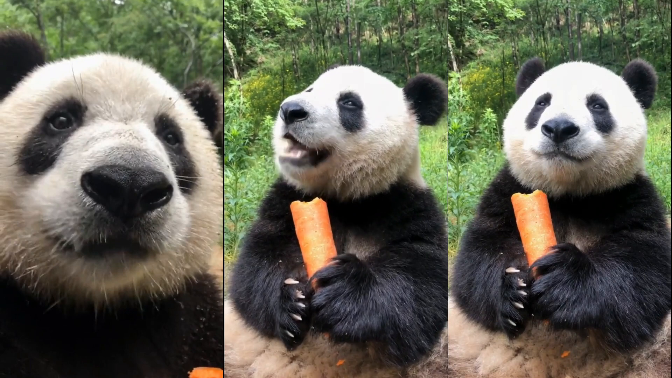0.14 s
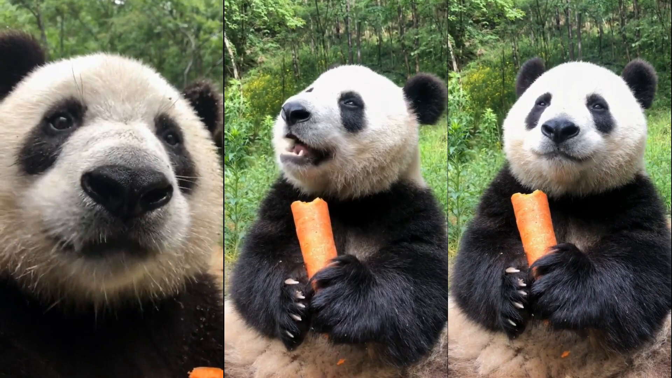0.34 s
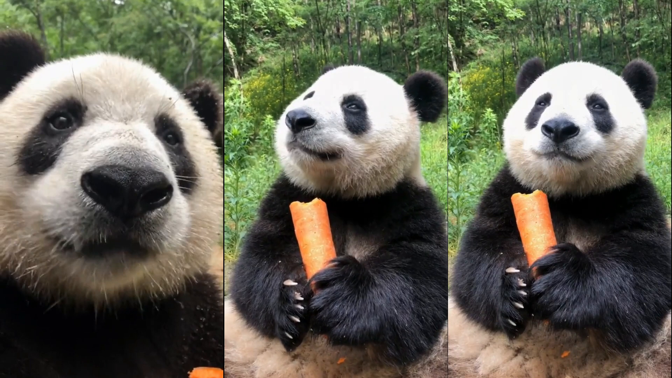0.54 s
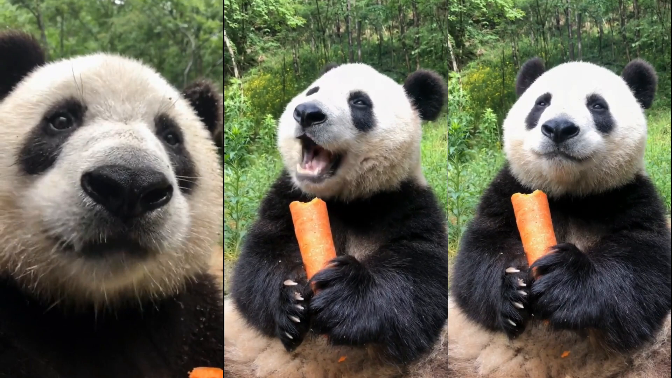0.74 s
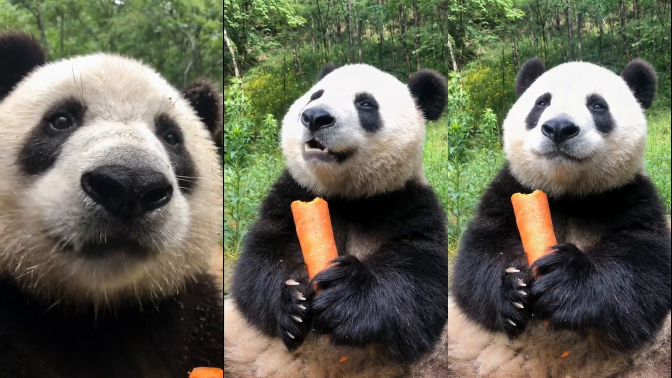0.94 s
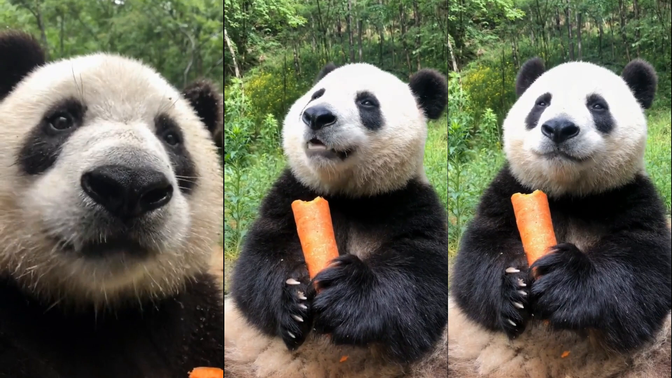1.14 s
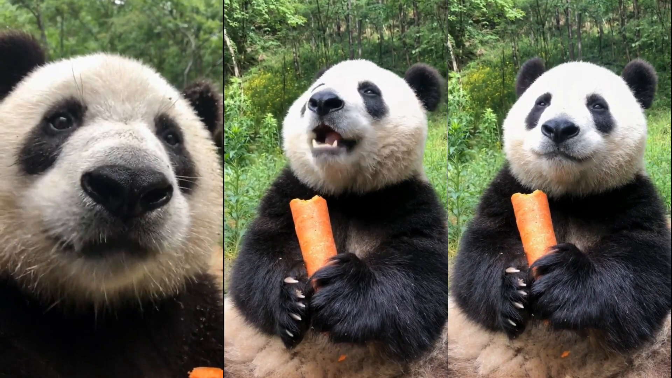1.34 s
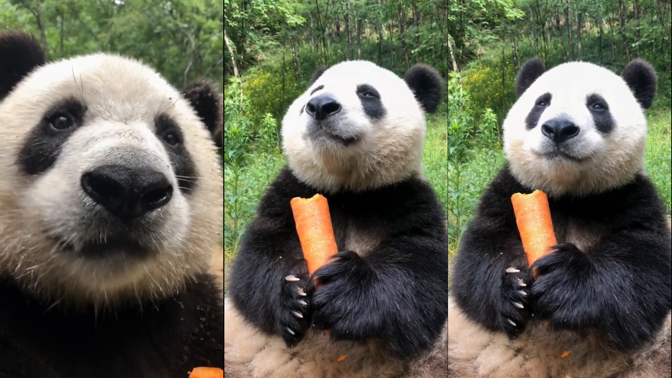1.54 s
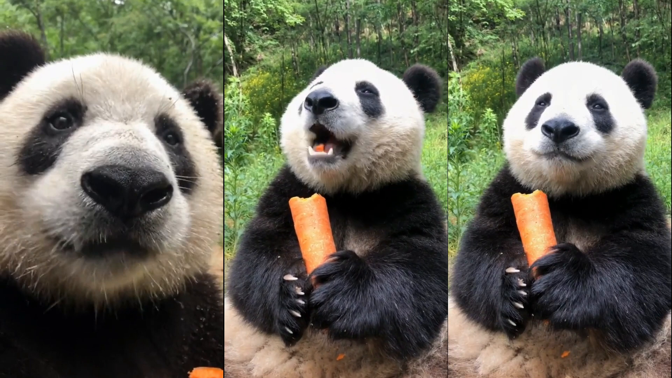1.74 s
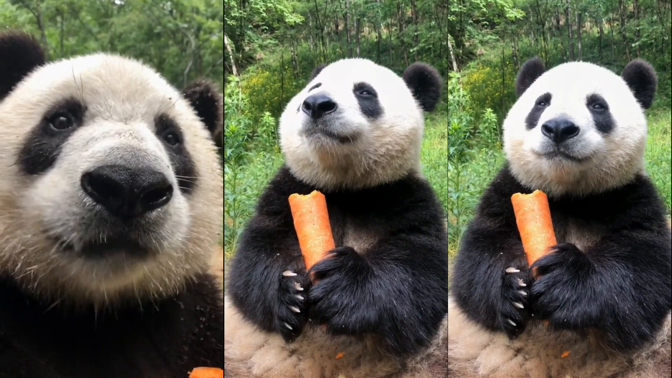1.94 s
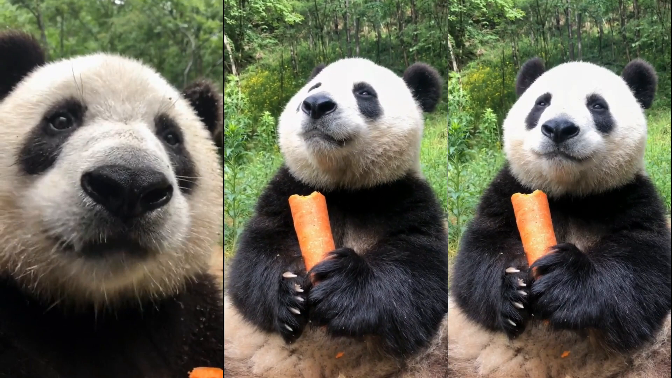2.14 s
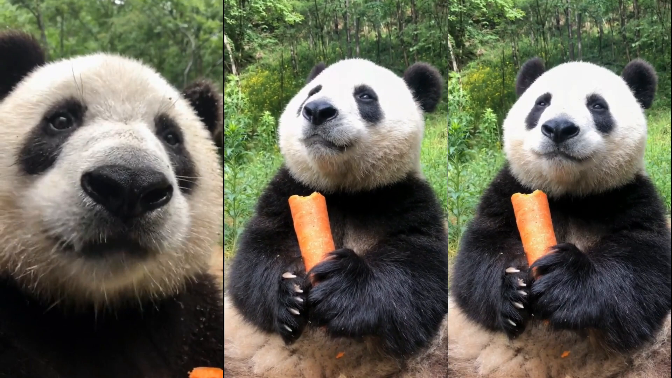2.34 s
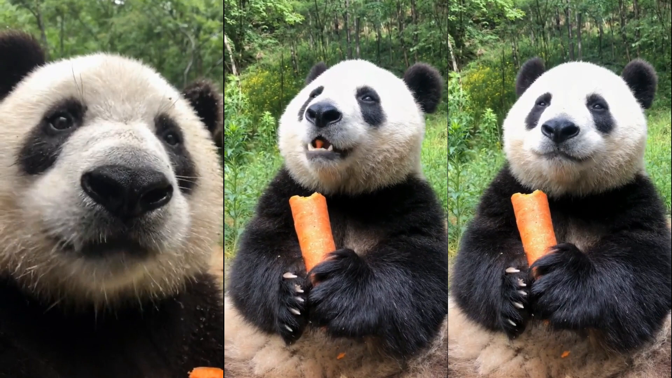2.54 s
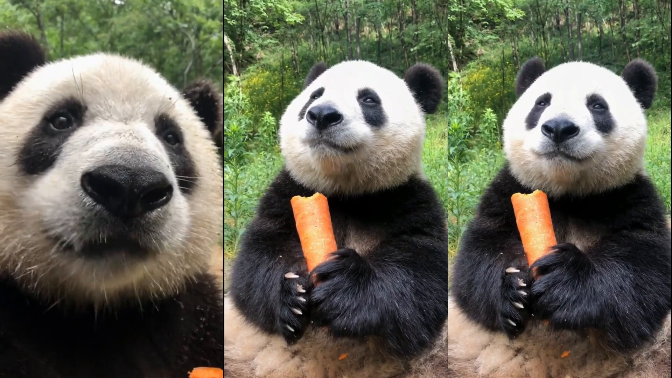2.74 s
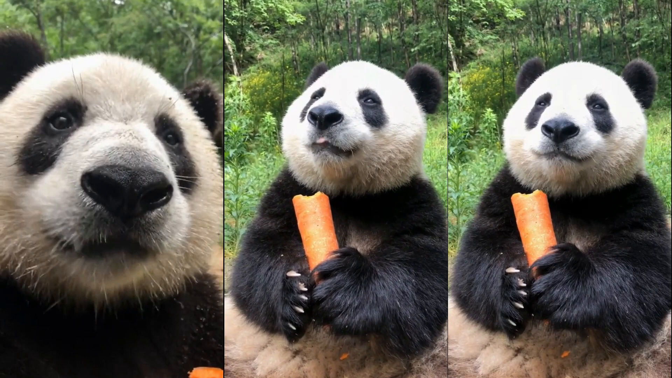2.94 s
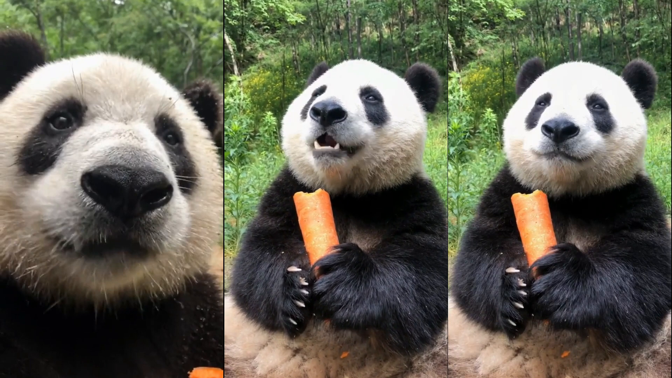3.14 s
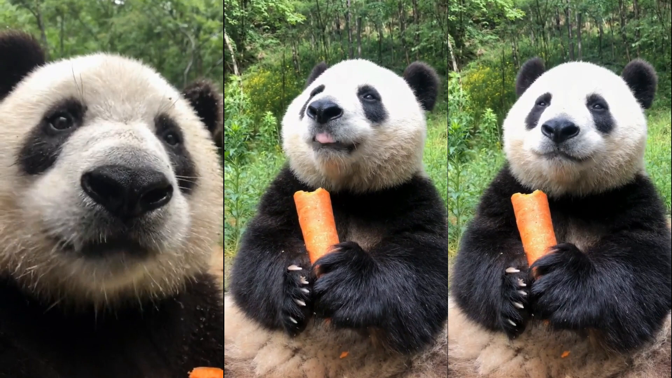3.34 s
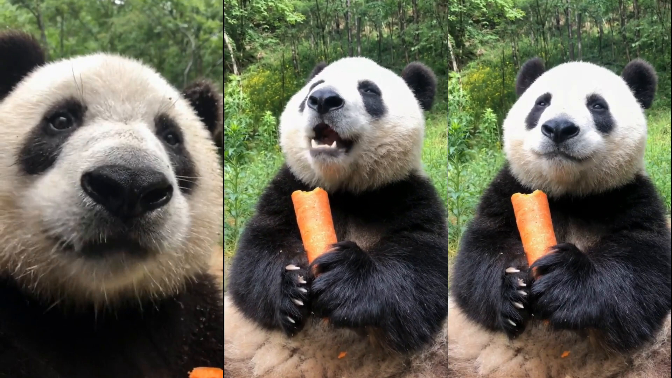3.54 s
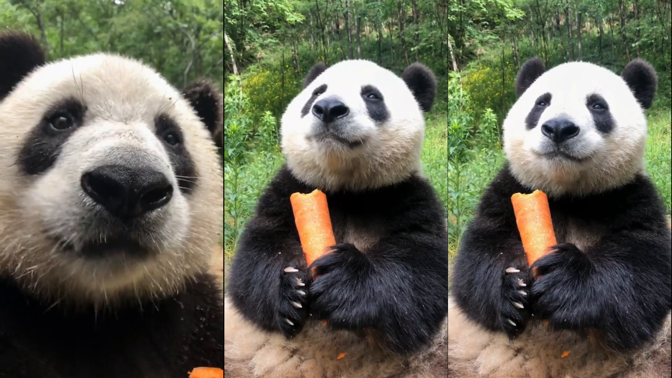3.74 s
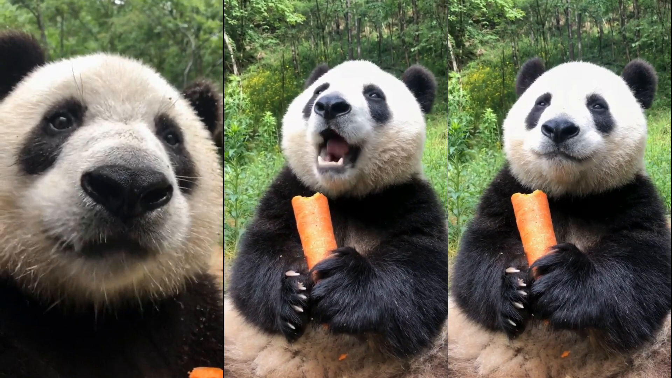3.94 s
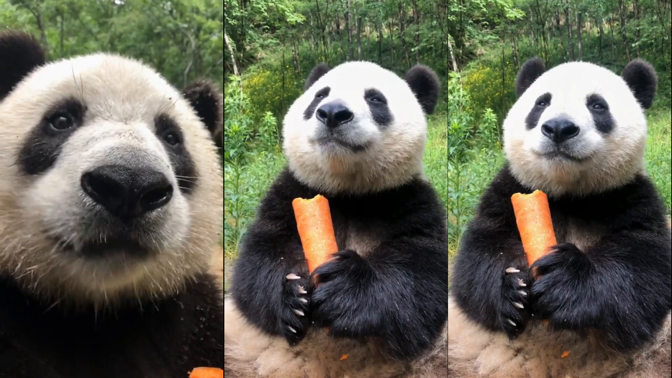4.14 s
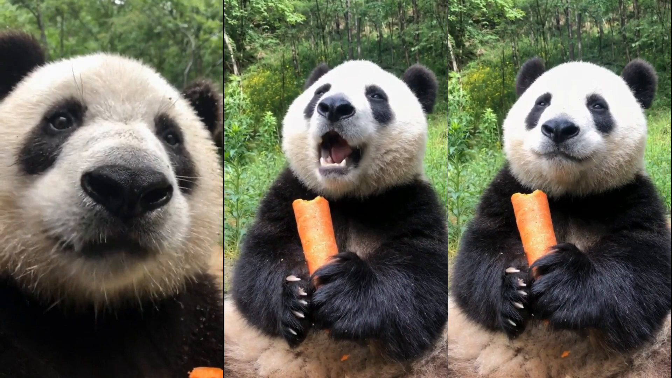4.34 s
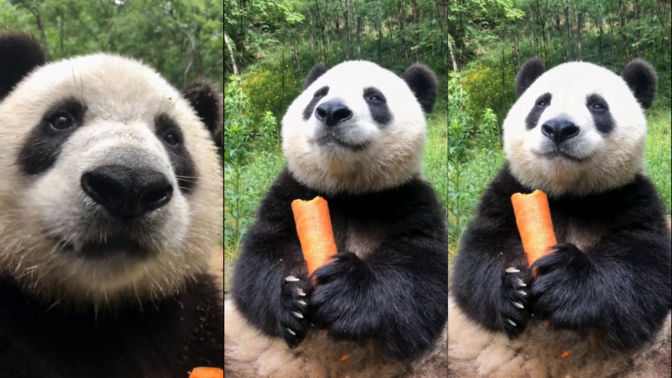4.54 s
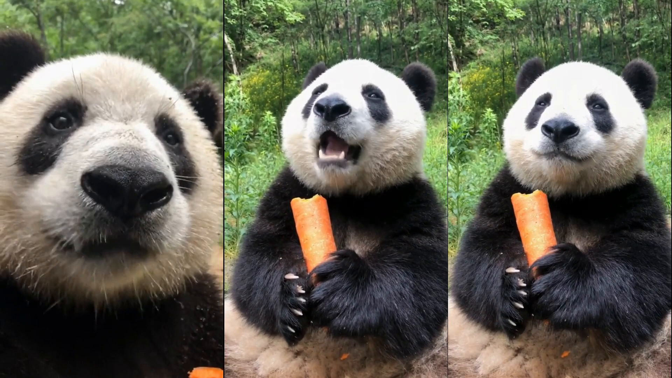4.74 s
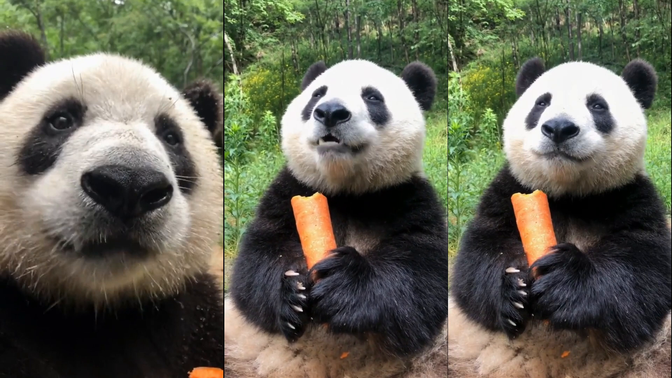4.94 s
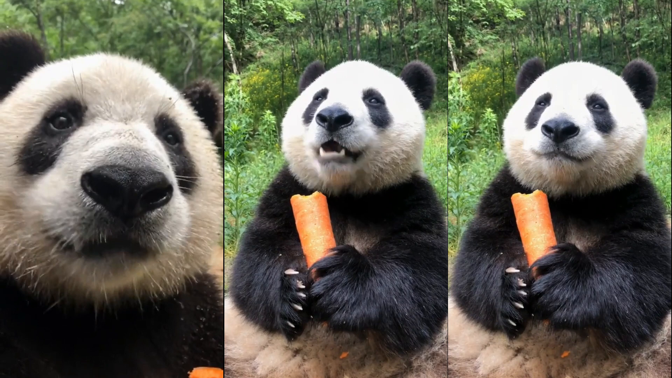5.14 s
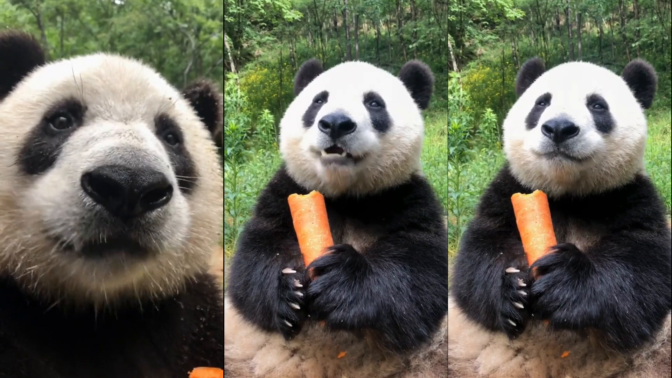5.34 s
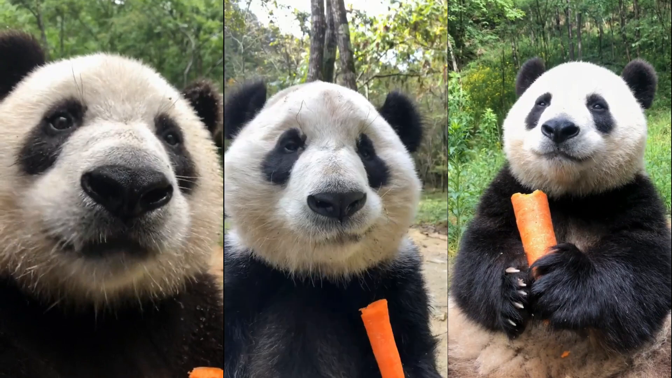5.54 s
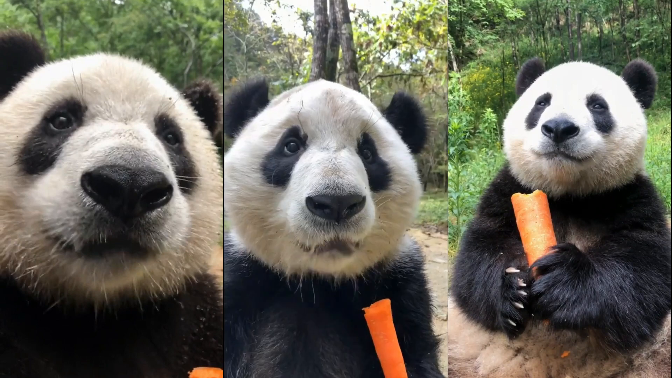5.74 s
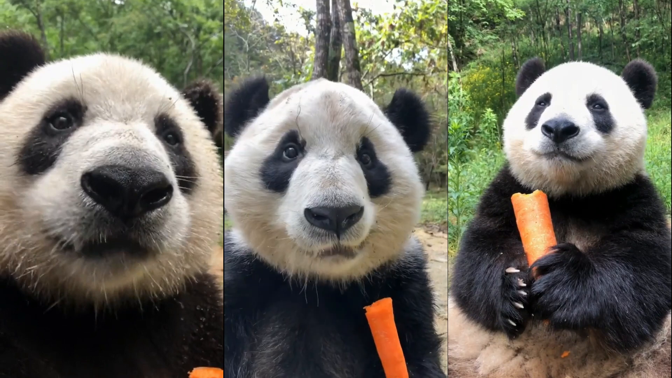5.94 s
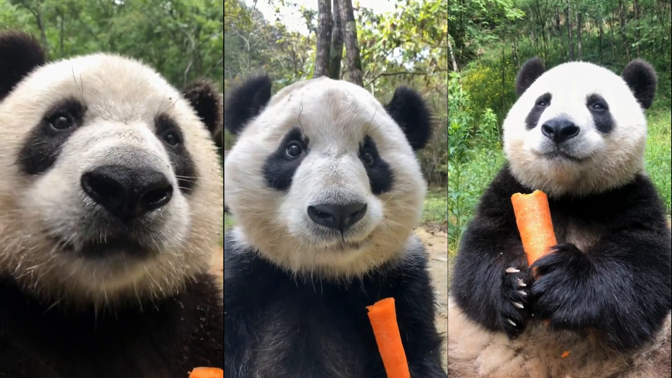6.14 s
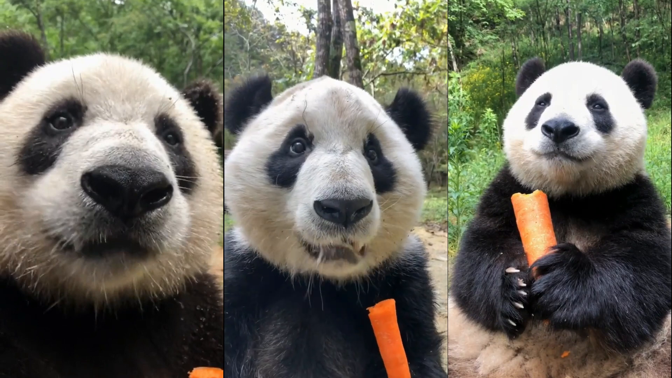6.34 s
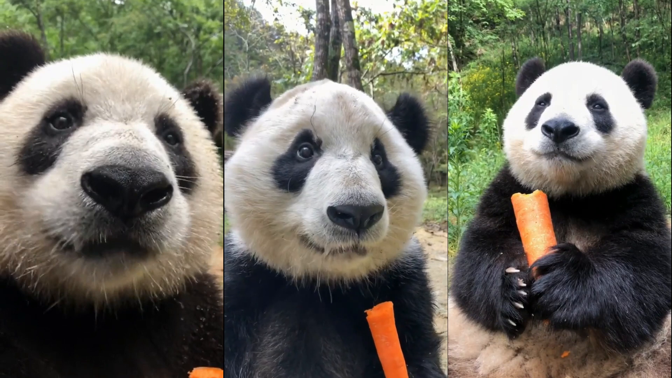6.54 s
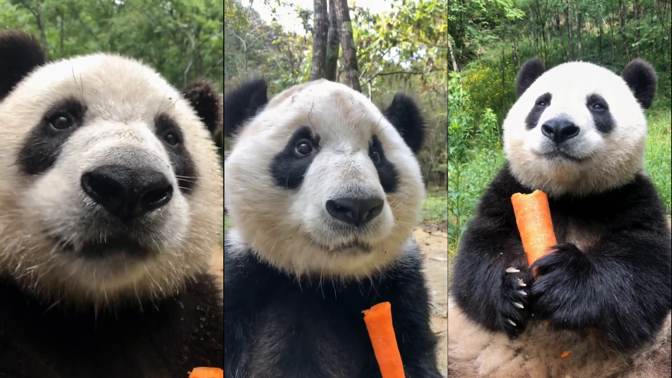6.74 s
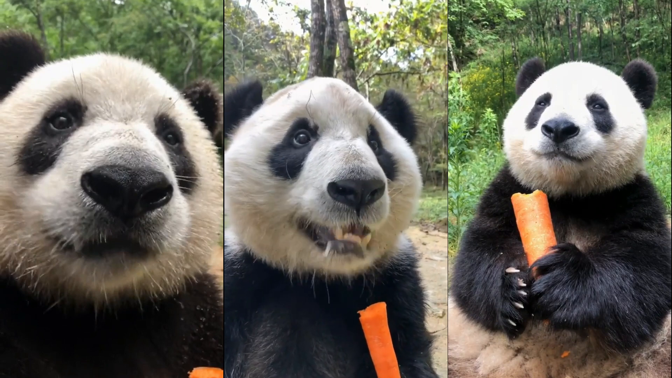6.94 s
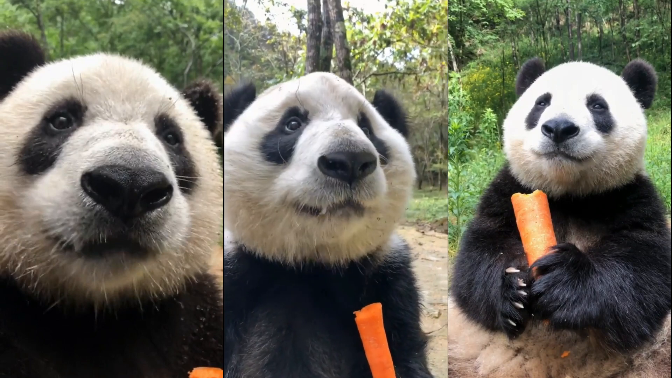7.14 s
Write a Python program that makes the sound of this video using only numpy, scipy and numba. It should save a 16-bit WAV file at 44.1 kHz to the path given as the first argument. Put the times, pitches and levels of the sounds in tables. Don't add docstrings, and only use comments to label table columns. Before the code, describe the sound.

Very close to the microphone, a panda chews raw carrot outdoors: brittle snaps and crackling bursts, wet pulp sliding, a low throat rumble. Small birds whistle behind, echoing among trees. Crunching eases after two seconds, returns around three and a half, and ends in a loud crack. After a tiny silence near 5.6 seconds, softer, muffled chews continue in a noisier yard.

```python
import sys
import numpy as np
from scipy import signal
from scipy.fft import rfft, irfft, next_fast_len
from scipy.io import wavfile
from scipy.ndimage import uniform_filter1d
from numba import njit

SR = 44100
rng = np.random.default_rng(int(sys.argv[2]) if len(sys.argv) > 2 else 0)


def attenuation_scalar(level_db):
    decades = np.asarray(level_db, float) / 20
    return 10 ** decades


def digitize_waveform(pressure):
    field = np.atleast_2d(pressure).T
    bounded = np.clip(field, -1, 1)
    quanta = np.round(bounded * 32767).astype(np.int16)
    wavfile.write(sys.argv[1], SR, quanta)


N = 316638

# greatest pressure in seconds, build-up in seconds,
# let-go in seconds, crackle in dB, brightness in dB.
BITES = [(.09, 0.36, 0.079, -35.5, -9.5), (0.257, 0.033, 0.057, -43, -22), (0.506, 0.13, 0.11, -26, -6),
         (0.71, 0.054, 0.022, -36, -12), (1.561, 0.093, 0.051, -33, -16), (.93, 0.26, 0.065, -51.5, 9),
         (1.071, 0.16, 0.12, -33.5, -7), (1.251, 0.057, 0.063, -37, -32), (1.496, 0.098, 0.054, -31, -4),
         (1.698, 0.038, 0.048, -32, -48), (1.936, 0.087, 0.13, -34, -20), (2.811, 0.15, 0.081, -48.5, -9.5),
         (3.35, 0.2, 0.046, -54, 2), (3.5, 0.048, 0.088, -49, -6), (3.698, 0.087, 0.14, -32, -8),
         (3.942, 0.063, 0.081, -32, -18), (4.16, 0.12, 0.11, -41.5, -7.5),
         (4.388, 0.093, 0.073, -37.5, -11), (4.61, 0.15, 0.13, -42.5, -13),
         (4.831, 0.084, 0.048, -38.5, -11), (5.053, 0.12, 0.13, -32, -10), (5.261, 0.03, 0.051, -24.5, -20),
         (5.419, 0.075, 0.18, -37.5, -7.5), (5.49, 0.057, 0.17, -38.5, -14)]
YARD_BITES = [
    (5.87, 0.035, .06, -41, -24),
    (6.065, 0.023, 0.062, -37, -25),
    (6.455, 0.036, 0.11, -35.5, -50),
    (6.525, 0.038, 0.031, -40.5, -53),
    (7.18, 0.081, .05, -37.5, -60),
]
EDGE_LOSS_DB, EDGE_CURVE = 28.5, 1.36
RESTING_DB, YARD_RESTING_DB, RESTING_BRIGHT_DB = -62.5, -50, -20
HOLLOW_DB, HOLLOW_PER_DB, HOLLOW_LATE_DB = -4, -0.0929, 8
SAG_PER_S = 1.0

# centre in Hz, width in Hz, lift in dB.
MOUTH = [(1280, 130, -8), (2600, 200, 3), (3700, 400, 3), (4350, 300, 2), (6400, 500, 2)]
# frequency in Hz, level in dB per Hz.
FIBRE_SPECTRUM = [(400, -6.5), (800, -1.5), (1600, 5.5), (3000, -4), (5000, -5), (9000, -13.5), (13000, -9)]

# time in seconds, peak in dB, ring in Hz,
# sharp edge in dB.
SNAPS = [(0.023, -25, 2300, -14), (0.035, -17, 2020, -20), (0.084, -18.5, 2660, -44),
         (0.106, -13.5, 1760, -8), (0.252, -54, 990, -6), (0.391, -28.5, 1720, -7),
         (0.417, -22.5, 1730, -34), (0.436, -25, 1010, 1.5), (0.484, -24, 1640, -18),
         (0.502, -17.5, 1690, 1), (0.573, -24.5, 1560, -38.5), (0.71, -16, 1550, -37),
         (0.881, -28, 1670, -15), (0.92, -20.5, 1480, -7), (0.937, -23, 1590, -4),
         (1.008, -17.5, 4570, -27), (1.05, -23.5, 2030, -11), (1.079, -19, 2060, -10),
         (1.245, -27, 1580, -29), (1.39, -34, 3680, -2), (1.485, -27.5, 4270, 6), (1.496, -23, 2020, -9),
         (1.688, -25.5, 844, -58), (1.699, -24, 1860, -48), (1.907, -32, 4320, -28),
         (0.463, -22, 4340, -16), (0.002, -22.5, 2200, -11), (0.507, -12.5, 2220, -3.5),
         (3.481, -33, 1540, -9), (3.673, -16, 2060, -9), (3.695, -15, 2330, -9),
               (3.701, -19.5, 3580, -6), (3.725, -24, 2580, -19), (3.934, -25, 1510, -18),
               (3.960, -25, 2100, -17), (3.905, -30, 2530, -7), (3.916, -18.5, 1530, -25),
               (4.338, -23, 1461, -1), (4.382, -16, 1530, -29), (4.458, -30.5, 2660, 9.5),
               (4.5, -31, 2960, -27), (4.821, -30, 1400, 9), (5.039, -24, 2240, -13.5),
               (5.044, -19.5, 2300, -4), (5.054, -14, 2410, -13), (5.218, -31, 2410, -3),
               (5.248, -14.5, 1590, -26.5), (5.351, -28, 826, -32), (5.402, -21.5, 870, -24),
               (5.483, -23, 2400, -17),
         (0.06, -15.5, 1830, -8), (0.057, -22.5, 3000, -32), (0.26, -25.5, 730, -6), (0.53, -10, 2030, -12),
         (0.71, -27, 1860, -28), (0.95, -19, 1760, -23), (0.29, -30.5, 2300, -10),
         (0.032, -21.5, 3000, -17), (0.005, -20.5, 2150, -17), (2.135, -38, 3400, -15),
         (1.134, -21.5, 790, -36), (1.828, -31, 1600, -24), (2.141, -33, 1630, -27), (2.5, -56, 1500, 11),
         (2.655, -40.5, 1570, -2), (2.796, -33.5, 814, -6), (2.833, -36, 690, -33), (3.343, -38, 1340, -21),
         (3.593, -37.5, 1680, -7), (3.805, -30.5, 1560, -16), (4.041, -31, 3300, -11),
         (4.77, -36.5, 2050, -28), (5.083, -19, 907, -25), (5.262, -15, 1480, 0), (5.414, -24.5, 2700, -4),
         (5.472, -25, 3260, -17), (3.365, -41, 2700, -13), (3.781, -30, 2000, -19.5),
         (4.592, -28.5, 2100, -22),
         (5.749, -30, 1000, -23), (5.895, -25.5, 760, -31), (6.064, -24.5, 1100, -35),
              (6.18, -23.5, 1340, -38), (6.237, -25.5, 1120, -36), (6.274, -24.5, 1050, -19),
              (6.444, -25, 2200, -29), (6.482, -26.5, 1700, -20), (6.47, -34, 1250, -5),
              (6.455, -31, 1900, -25), (6.512, -28, 670, -30), (6.505, -28.5, 1600, -38),
              (6.529, -24.5, 1540, -46), (6.763, -26.5, 790, -47), (7.175, -16.5, 1300, -50),
         (.088, -21, 2770, -20), (.098, -20, 2430, -18), (.159, -33, 1680, -7),
               (.473, -22, 3220, -18), (0.494, -21, 4300, -11), (.559, -40, 1680, -8),
               (0.869, -35, 2400, -20), (.898, -34, 1530, -9), (.985, -31, 1080, -5),
               (1.019, -22, 2150, -16), (1.057, -22, 2000, -8), (1.085, -22.5, 2100, -7),
               (1.103, -19, 840, -17), (1.115, -24, 800, -17), (1.226, -36, 1600, -21),
               (1.258, -31.5, 2500, -25), (1.289, -36, 1550, -20), (1.452, -31, 1660, -2),
               (1.733, -39, 3660, -3), (1.946, -38, 1710, -20), (1.963, -31, 1900, -27),
               (1.932, -26, 750, -25),
         (3.385, -49, 2520, -20), (3.510, -38, 1530, -24), (3.551, -39, 1600, -14),
                     (3.638, -37, 2210, -5), (3.709, -21, 2670, -19), (3.733, -20.5, 1550, -27),
                     (3.948, -17, 1700, -8), (4.101, -38, 1700, -5), (4.16, -42, 2010, -21),
                     (4.374, -26, 3640, -22), (4.393, -26.5, 1560, 0), (4.616, -35, 1480, -24),
                     (4.642, -30.5, 820, -18), (4.666, -41, 830, 4), (4.915, -40.5, 3540, 0),
                     (4.994, -34, 2220, -2), (5.172, -37, 958, -18), (5.223, -32, 2580, -11.5),
                     (5.274, -24, 1690, -24), (5.369, -34, 890, -28), (5.439, -27, 2130, -16),
                     (5.773, -37, 2980, -4), (5.871, -36, 2010, -22), (6.161, -34, 2500, -23),
                     (6.299, -34, 1200, -5), (6.423, -37, 1000, -11), (6.953, -33.5, 900, -0.5),
                     (7.078, -35, 810, -15.5), (5.887, -37, 4300, -10), (6.065, -38, 4430, -21)]
# centre in Hz, width in Hz, level in dB.
SNAP_CAVITIES = [(1084, 170, -7.5), (2100, 117, -5), (3220, 480, -8.5), (4300, 320, -10.5),
                 (6030, 300, -20)]

# time in seconds, peak in dB.
CRACKS = [
    (0.106, -13),
    (0.513, -23),
    (0.938, -20),
    (1.008, -15),
    (1.7, -39),
    (1.907, -35),
    (3.674, -27.5),
    (4.459, -31),
    (5.263, -2.5),
]
CRACK_HZ, CRACK_WIDTH_HZ = 4900, 2300

# time in seconds, first resonance in Hz, second resonance in Hz.
CAVITY = [(0.0, 1055, 1930), (0.28, 756, 1850), (0.54, 1100, 1950), (0.6, 674, 1700), (0.68, 1066, 1860),
          (0.92, 870, 1620), (1.04, 1000, 2180), (1.16, 680, 1630), (1.46, 950, 1610), (1.78, 776, 1570),
          (2.56, 864, 1830), (4.88, 734, 1540), (5.04, 820.5, 2130), (5.24, 962, 1560), (5.48, 860, 2220),
          (5.54, 910, 1740), (6.86, 818, 1710), (7.18, 890, 1570)]
# ratio to the second, width in Hz, level in dB.
UPPER_CAVITIES = [(1.55, 300, -20), (1.95, 350, -18)]
# time in seconds, build-up in seconds, let-go in seconds, level in dB.
SLIDES = [(.35, .14, 0.15, -46), (.59, 0.062, 0.029, -38), (1.12, 0.046, 0.035, -41),
          (1.39, 0.014, 0.01, -38.5), (3.78, 0.059, 0.046, -31), (4.05, 0.23, 0.077, -47.5),
          (4.2, 0.041, 0.08, -43.5), (1.7, 0.03, 0.021, -51), (4.93, 0.053, 0.043, -53),
          (5.44, 0.19, 0.17, -47.5), (6.51, 0.052, 0.033, -38.5)]

# time in seconds, build-up in seconds, let-go in seconds, level in dB.
GROANS = [
    (.12, 0.12, 0.2, -48),
    (3.9, 0.17, 0.37, -43),
    (4.83, 0.06, 0.052, -46),
]
GROAN_HZ, GROAN_WIDTH_HZ = 148, 113
RUMBLE_DB, RUMBLE_FOLLOWS, RUMBLE_SMOOTH_S = -57, 0.52, 0.015

# start in seconds, level in dB.
RISING = [
    (.53, -51.5),
    (3.015, -49.5),
    (3.41, -48.5),
    (3.84, -50),
]
FALLING = [
    (1.96, -72),
    (3.18, -58.5),
    (3.585, -57),
]
HIGH_FALLING = [
    (.715, -60.5),
    (1.125, -60.5),
]
# length in seconds, start in Hz, middle in Hz, end in Hz.
RISING_SHAPE = (.1, 3720, 4320, 5400)
FALLING_SHAPE = (0.084, 7750, 6950, 6200)
HIGH_FALLING_SHAPE = (.1, 8200, 7200, 5300)
# start in seconds, length in seconds, start in Hz, end in Hz, level in dB.
SONG = [
    (1.355, 0.1, 3296, 4010, -40.5),
    (1.445, 0.048, 4010, 4440, -41),
    (1.595, 0.052, 3980, 4290, -37),
    (1.71, 0.066, 3426, 3906, -37.5),
    (1.78, 0.082, 3880, 3820, -45.5),
    (1.86, 0.067, 4030, 4360, -39.5),
    (1.93, 0.063, 4330, 5290, -41.5),
]
NOTES = [(.29, 0.047, 2020, 2120, -54), (.62, 0.068, 2156, 2090, -53.5), (.775, 0.097, 3010, 2780, -54.5),
         (1.295, 0.034, 2660, 2480, -47), (2.14, 0.074, 6440, 7560, -67), (3.96, 0.096, 5800, 5450, -55),
         (4.2, .13, 5740, 5700, -72), (.31, 0.06, 6800, 7300, -58), (3.88, 0.033, 6300, 7600, -51),
         (5.35, 0.051, 3980, 4470, -61), (.19, 0.028, 2990, 2800, -52), (4.15, 0.13, 6440, 6270, -63),
         (4.47, 0.073, 6440, 6400, -61), (5.185, 0.027, 3270, 2970, -54), (5.55, 0.031, 5420, 5500, -55)]
SONG_ARCH_HZ, NOTE_ARCH_HZ = 88, 30
TREES_T60_S, TREES_DB, NEAR_T60_S, NEAR_DB = 0.94, 4.5, 0.11, -2.5

# frequency in Hz, level in dB per Hz.
WOODS_SPECTRUM = [(18, -68), (30, -17), (54, -7.5), (92, -13), (209, -8), (323, -10.5), (525, -4),
                  (970, -9), (4380, -10.5), (13500, -27.5)]
# time in seconds, level in dB.
WOODS_LEVEL = [(0.0, -53), (0.59, -49), (0.67, -56), (1.8, -51), (2.36, -57), (3.46, -56), (3.82, -48.5),
               (4.8, -53), (5.25, -50.5), (5.41, -54), (5.53, -41), (5.58, -65)]
# frequency in Hz, level in dB per Hz.
YARD_SPECTRUM = [(15, -44), (25, -7), (76, 4.5), (128, -0.5), (254, 2), (330, -1.5), (945, -2.5),
                 (5970, -18.5), (12500, -35), (13500, -38)]
YARD_DB = -41

# start in seconds, end in seconds.
CENTRED = [(.13, .17), (.28, .32), (.68, .76), (.89, .925), (1.16, 1.24), (1.43, 1.51), (1.57, 1.68),
           (1.73, 1.79), (1.84, 1.88), (3.19, 3.27), (3.77, 3.84), (4.21, 4.38), (4.66, 4.82), (4.99, 5.02),
           (5.19, 5.25), (5.31, 5.47), (6.93, 7.0)]
WIDE_ABOVE_HZ, WIDE_DB, WIDE_SHARE = 4150, -.5, .64
GAP_START_S, GAP_END_S = 5.581, 5.694
CUTOFF_HZ = 13100


def swell_db(s, rise_s, fall_s):
    t = np.arange(N) / SR - s
    return -EDGE_LOSS_DB * np.where(t < 0, -t / rise_s, t / fall_s) ** EDGE_CURVE


def swells(rows):
    return sum(attenuation_scalar(db + swell_db(s, rise_s, fall_s)) for s, rise_s, fall_s, db in rows)


def jaw():
    t = np.arange(N) / SR
    power = attenuation_scalar(2 * np.where(t < GAP_END_S, RESTING_DB, YARD_RESTING_DB))
    bright, since = power * RESTING_BRIGHT_DB, 0
    for s, rise_s, fall_s, db, bright_db in BITES + YARD_BITES:
        part = attenuation_scalar(2 * (db + swell_db(s, rise_s, fall_s)))
        power = power + part
        bright = bright + part * bright_db
        since = since + part * (t - s)
    level_db = 10 * np.log10(power)
    since = since / power
    hollow_db = HOLLOW_DB + HOLLOW_PER_DB * (level_db + 47.0) + HOLLOW_LATE_DB * np.tanh(since / 0.08)
    return level_db, bright / power, hollow_db, 1 - SAG_PER_S * since


def rms_one(x):
    return x / np.sqrt(np.mean(x ** 2) + 1e-20)


def drift(rate_hz):
    r = np.exp(-2 * np.pi * rate_hz / SR)
    noise = rng.standard_normal(N + SR)
    return rms_one(signal.lfilter([1], [1, -2 * r, r * r], noise)[SR:])


def resonance(x, hz, width_hz):
    r = np.exp(-np.pi * width_hz / SR)
    poles = [1, -2 * r * np.cos(2 * np.pi * hz / SR), r * r]
    return signal.lfilter([(1 - r * r) / 2, 0, (r * r - 1) / 2], poles, x + 1e-18)


def at_hz(points, hz):
    points_hz, points_db = np.transpose(points)
    return np.interp(np.log(np.maximum(hz, 1)), np.log(points_hz), points_db)


def cracks(per_s, spread_db, clump_db):
    size_db = spread_db * np.minimum(rng.exponential(1, N), 4) + clump_db * drift(30)
    sizes = attenuation_scalar(size_db) * rng.standard_normal(N)
    return sizes * (rng.random(N) < per_s / SR)


def crackle(sharpness):
    level_db, bright_db, _, _ = jaw()
    trains = [cracks(per_s=900 + 60 * group ** 2, spread_db=3.8 - .2 * group, clump_db=4.5 - .2 * group)
              for group in range(8)]
    out = 0
    shared = attenuation_scalar(2.9 * drift(80))
    for k, hz in enumerate(np.geomspace(400, 13000, 24)):
        clicks = trains[k // 3] * rng.choice([-1, 0, 1], N)
        grains = rms_one(resonance(clicks, hz, hz / sharpness))
        lift_db = sum(db * np.exp(-((hz - centre_hz) / width_hz) ** 2) for centre_hz, width_hz, db in MOUTH)
        high = np.clip(np.log(hz / 2600) / np.log(4.0), 0, 1)
        gain_db = at_hz(FIBRE_SPECTRUM, hz) + lift_db + high * (bright_db + 9.5)
        out = out + grains * np.sqrt(hz / 1600) * attenuation_scalar(gain_db)
    out = out * shared
    top = 3.5 * np.std(out)
    return top * np.tanh(out / top) * attenuation_scalar(level_db - 16.0)


def snaps(ring_s, burst_s, rise_s):
    out, t = np.zeros(N + 2000), np.arange(1200) / SR
    rows = SNAPS
    noise = rng.standard_normal((len(rows), 2, 1200))
    noise = noise * rng.exponential(1, noise.shape) ** 1.18 / 1.58
    overtones_db = rng.normal(0, 4.9, (len(rows), len(SNAP_CAVITIES)))
    edge_filter = signal.butter(2, [2600, 8500], "band", fs=SR, output="sos")
    for (s, peak_db, hz, edge_db), (body, edge), shares_db in zip(rows, noise, overtones_db):
        ring = attenuation_scalar(-2.5) * np.sin(2 * np.pi * hz * t) * np.exp(-t / ring_s)
        upper = sum(attenuation_scalar(db + own_db + 10) * resonance(edge * np.exp(-t / 0.0014), cavity_hz, width_hz)
                    for (cavity_hz, width_hz, db), own_db in zip(SNAP_CAVITIES, shares_db))
        burst = attenuation_scalar(8.5) * resonance(body, hz * 1.018, hz * 0.33) * np.exp(-t / burst_s)
        tick_shape = np.exp(-((t - .0017) / 0.0032) ** 2)
        tick = attenuation_scalar(edge_db - 1.5) * signal.sosfilt(edge_filter, edge) * tick_shape
        thud = attenuation_scalar(-0.5) * resonance(edge, 510, 540) * np.exp(-t / 0.003)
        onset = 1 - np.exp(-t / rise_s)
        out[round(s * SR):][:1200] += attenuation_scalar(peak_db) * onset * (ring + upper + burst + tick + thud)
    return out[:N]


def clean_cracks():
    s, db = np.transpose(CRACKS)
    clicks = np.zeros(N)
    clicks[(s * SR).astype(int)] = -attenuation_scalar(db) * SR / CRACK_WIDTH_HZ / np.pi
    return resonance(clicks, CRACK_HZ, CRACK_WIDTH_HZ)


def in_time(rows):
    s, *columns = np.transpose(rows)
    return [np.interp(np.arange(N) / SR, s, c) for c in columns]


@njit
def gliding(x, hz, width_hz, rate):
    y, r = np.zeros(len(x)), np.exp(-np.pi * width_hz / rate)
    for i in range(2, len(x)):
        fed = (1 - r) * (x[i] - x[i - 2])
        y[i] = fed + 2 * r * np.cos(2 * np.pi * hz[i] / rate) * y[i - 1] - r * r * y[i - 2]
    return y


def moving_cavity(pulp, hz, width_hz, outer_width_hz):
    return rms_one(gliding(gliding(pulp, hz, width_hz, SR), hz, outer_width_hz, SR))


def squelch():
    level_db, _, hollow_db, sag = jaw()
    first_hz, second_hz = in_time(CAVITY) * sag
    pulp = cracks(per_s=1200, spread_db=3.2, clump_db=2.5)
    first = moving_cavity(pulp, first_hz, 320.0, 510.0) * attenuation_scalar(level_db + hollow_db - 6.5)
    pulp = cracks(per_s=1600, spread_db=3.8, clump_db=2.5)
    second = moving_cavity(pulp, second_hz, 300.0, 610.0) * attenuation_scalar(level_db - 11.0)
    pulp = cracks(per_s=1500, spread_db=3.5, clump_db=3.0)
    slide = moving_cavity(pulp, first_hz, 160.0, 450.0) * swells(SLIDES)
    upper = sum(attenuation_scalar(level_db + db) * moving_cavity(pulp, second_hz * ratio, width_hz, 2 * width_hz)
                for ratio, width_hz, db in np.array(UPPER_CAVITIES))
    return first + second + slide + upper


def rumble():
    low = resonance(resonance(rng.standard_normal(N), 105, 100), 137, 490)
    low = signal.sosfilt(signal.butter(3, 55, "high", fs=SR, output="sos"), low)
    pressure_db = uniform_filter1d(jaw()[0], round(RUMBLE_SMOOTH_S * SR))
    groan = rms_one(resonance(low, GROAN_HZ, GROAN_WIDTH_HZ)) * swells(GROANS)
    return rms_one(low) * attenuation_scalar(RUMBLE_DB + RUMBLE_FOLLOWS * (pressure_db + 39.5)) + groan


def whistles():
    notes = []
    for rows, shape in ((RISING, RISING_SHAPE), (FALLING, FALLING_SHAPE), (HIGH_FALLING, HIGH_FALLING_SHAPE)):
        notes += [(s, *shape, db) for s, db in rows]
    for rows, arch_hz in ((SONG, SONG_ARCH_HZ), (NOTES, NOTE_ARCH_HZ)):
        for s, length_s, start_hz, end_hz, db in rows:
            notes.append((s, length_s, start_hz, (start_hz + end_hz) / 2 + arch_hz, end_hz, db))
    return notes


def birds():
    direct, rasp = np.zeros(N), drift(320)
    for s, length_s, start_hz, mid_hz, end_hz, db in whistles():
        u, at = np.linspace(0, 1, min(round(length_s * SR), N)), round(s * SR)
        hz = np.polyval(np.polyfit([0, .5, 1], [start_hz, mid_hz, end_hz], 2), u)
        rising = end_hz - start_hz > 1200
        hoarse = .15 + .4 * (db < -50 and not rising) + 2.5 * (start_hz - end_hz > 800)
        breath = np.sin(np.pi * u) ** .3 * (.25 + u if rising else 1)
        breath = breath * (1 + hoarse * rasp[at:at + len(u)])
        direct[at:at + len(u)] += attenuation_scalar(db) * breath * np.sin(2 * np.pi * np.cumsum(hz) / SR)
    t = np.arange(SR) / SR
    far = rms_one(rng.standard_normal(SR) * attenuation_scalar(-60 * t / TREES_T60_S))
    near = rms_one(rng.standard_normal(SR) * attenuation_scalar(-60 * t / NEAR_T60_S))
    echoes = (attenuation_scalar(TREES_DB) * far + attenuation_scalar(NEAR_DB) * near) / np.sqrt(SR)
    return attenuation_scalar(-6) * direct + signal.fftconvolve(direct, echoes)[:N]


def air(spectrum):
    size = next_fast_len(N)
    gain = attenuation_scalar(at_hz(spectrum, np.fft.rfftfreq(size, 1 / SR)))
    return rms_one(irfft(rfft(rng.standard_normal(N), size) * gain, size)[:N])


def spread(mid):
    hz, s, cells = signal.stft(mid, SR, window="cosine", nperseg=2048, noverlap=1024)
    band = np.floor(np.log(np.maximum(hz, 1) / WIDE_ABOVE_HZ) / np.log(1.13)).astype(int)
    chance = .6 * rng.random((10, len(s))) + .4 * rng.random(len(s))
    wide = chance < WIDE_SHARE * np.linspace(.35, 1.15, 10)[:, None] ** .6
    for start_s, end_s in CENTRED:
        inside = (s > start_s - .012) & (s < end_s + .012)
        wide[:, inside] &= chance[:, inside] < .2
    gate = wide[np.clip(band, 0, 9)] * (band >= 0)[:, None]
    turned = np.abs(cells) * np.exp(2j * np.pi * rng.random(cells.shape))
    side = signal.istft(turned * gate, SR, window="cosine", nperseg=2048, noverlap=1024)[1][:N]
    return attenuation_scalar(WIDE_DB) * side


def scene():
    t = np.arange(N) / SR
    trees = rumble() + birds() + air(WOODS_SPECTRUM) * attenuation_scalar(in_time(WOODS_LEVEL)[0] - 3.0)
    yard = air(YARD_SPECTRUM) * attenuation_scalar(YARD_DB)
    fibres = crackle(sharpness=11.0) + clean_cracks() + snaps(ring_s=0.0039, burst_s=0.0043, rise_s=0.00096)
    mid = fibres + squelch() + np.where(t < GAP_START_S, trees, yard)
    side = spread(mid)
    return np.array([mid + side, mid - side])


def band_limit(x):
    return signal.sosfilt(signal.butter(12, 14040, fs=SR, output="sos"), x)


def record(dry):
    t = np.arange(N) / SR
    cut = signal.sosfilt(signal.cheby2(14, 42, CUTOFF_HZ * 1.025, fs=SR, output="sos"), dry)
    rounded = .6 * np.tanh(cut / .6)
    rounded = signal.sosfilt(signal.butter(2, 35, "high", fs=SR, output="sos"), rounded)
    sounding = np.clip((GAP_START_S - t) / .004, 0, 1) + np.clip((t - GAP_END_S) / .003, 0, 1)
    return band_limit(rounded * sounding)


dry = scene()
out = record(dry)
digitize_waveform(out)
```